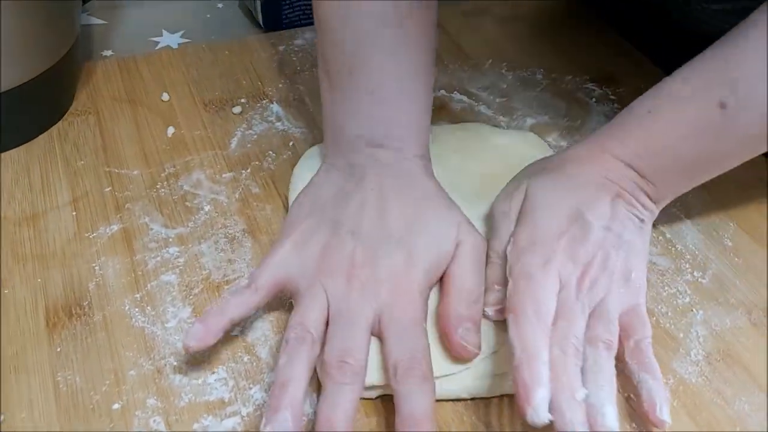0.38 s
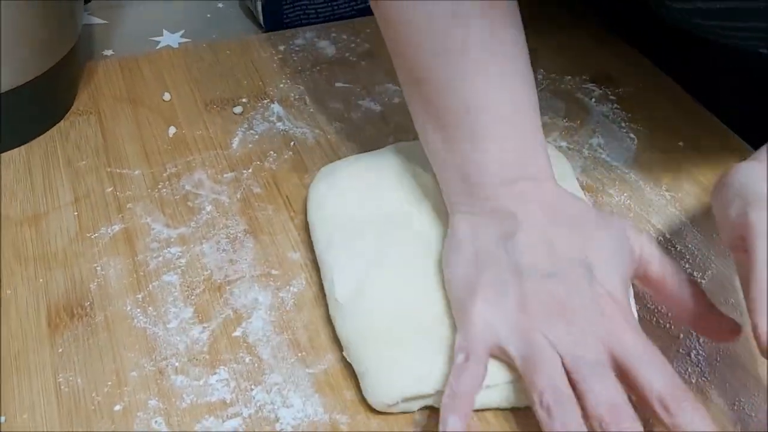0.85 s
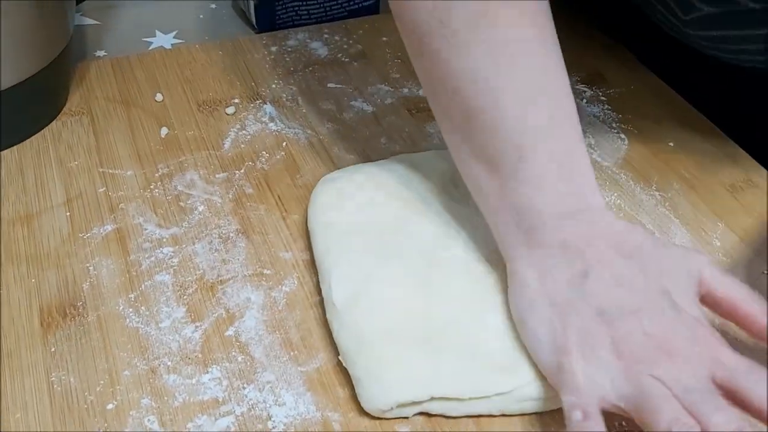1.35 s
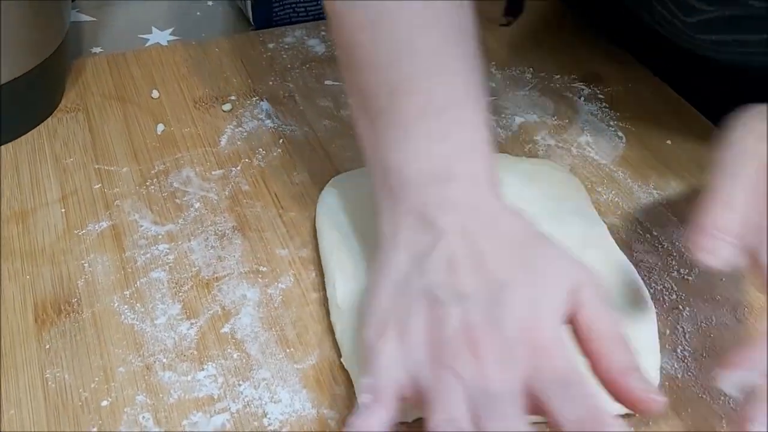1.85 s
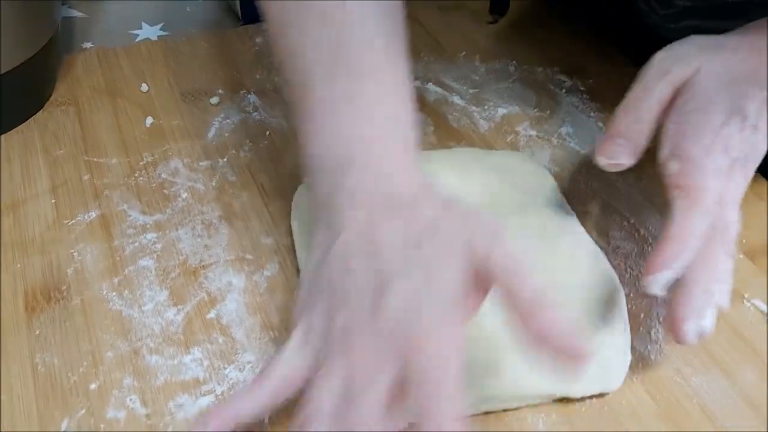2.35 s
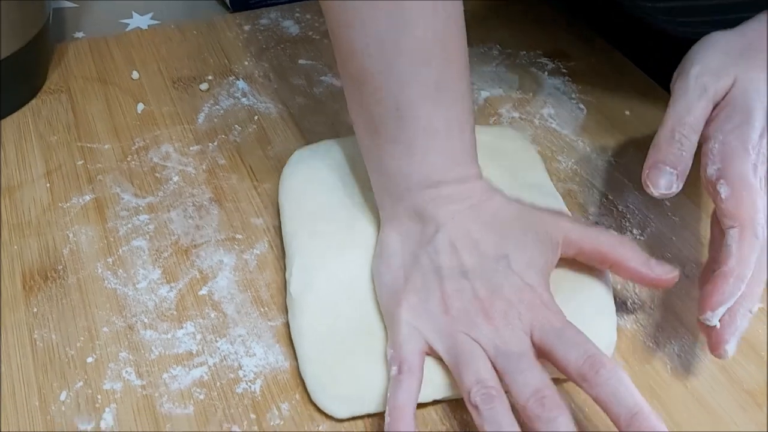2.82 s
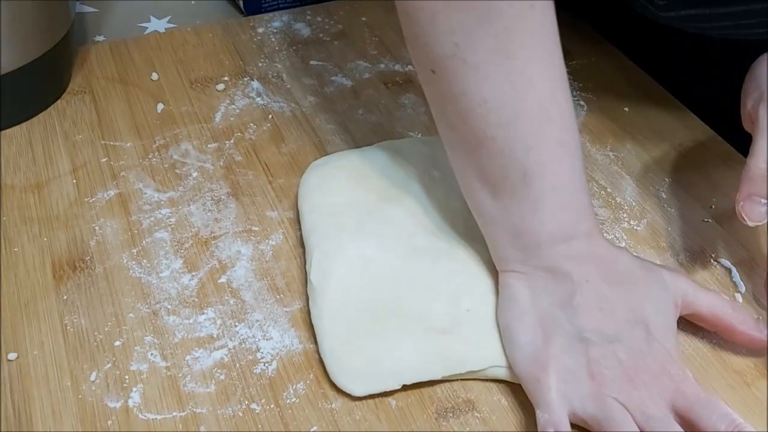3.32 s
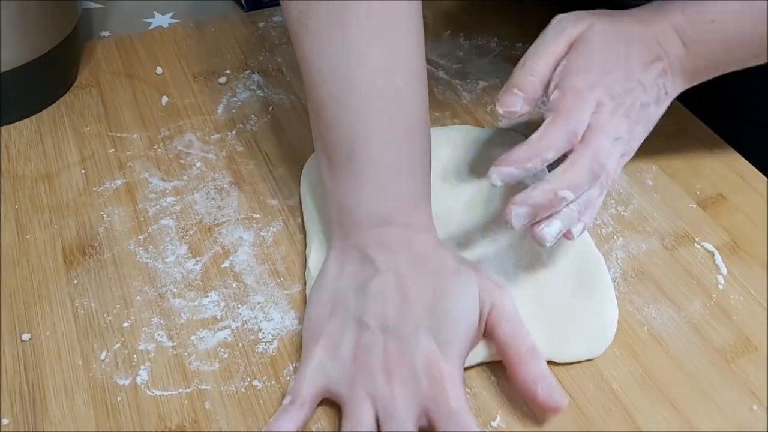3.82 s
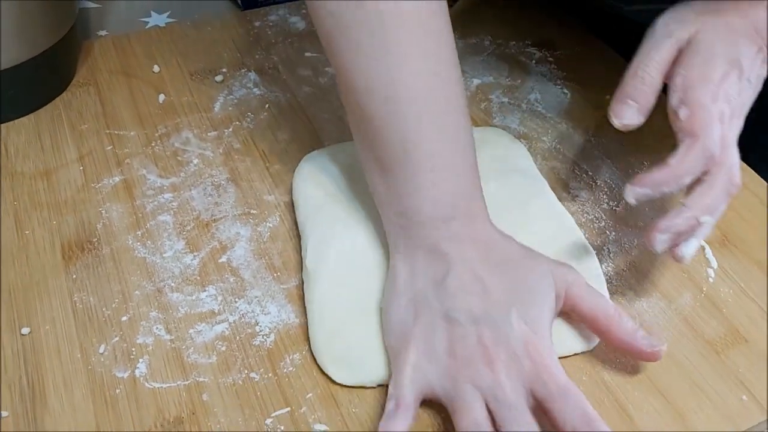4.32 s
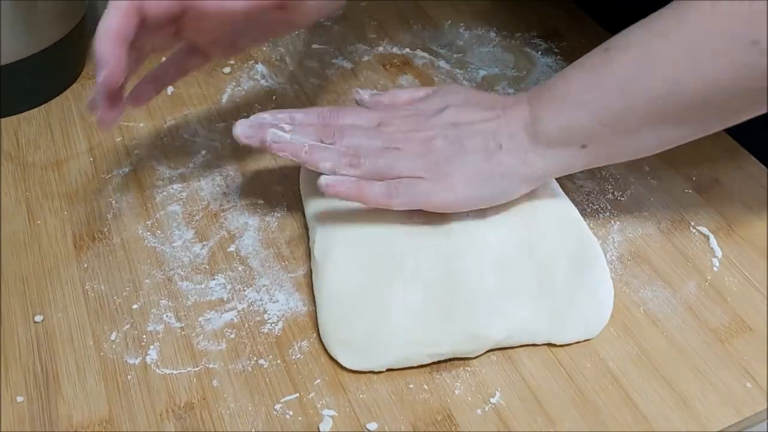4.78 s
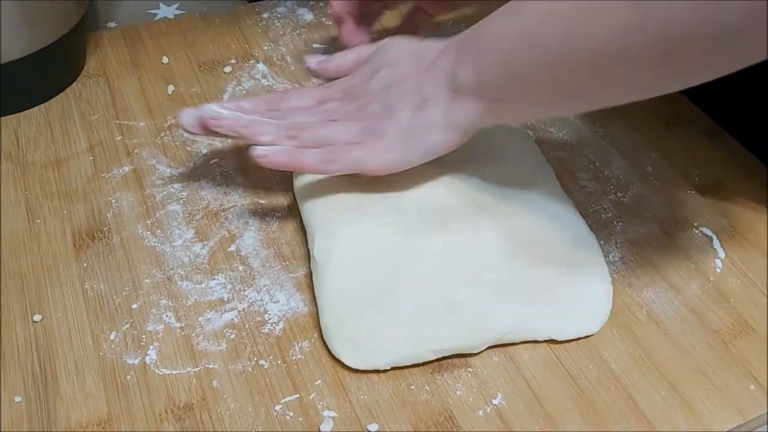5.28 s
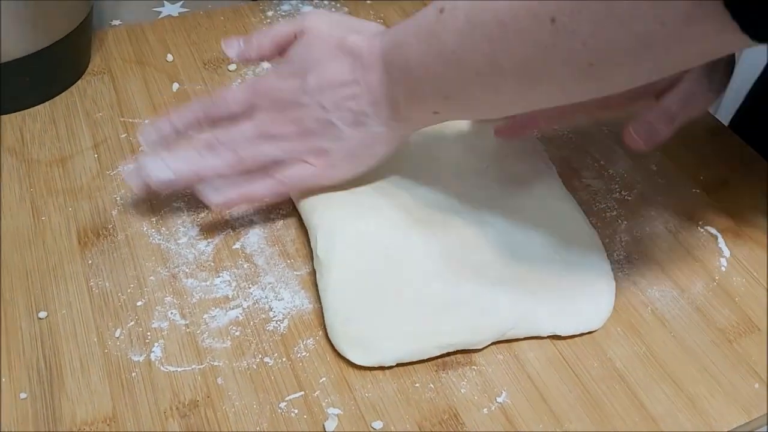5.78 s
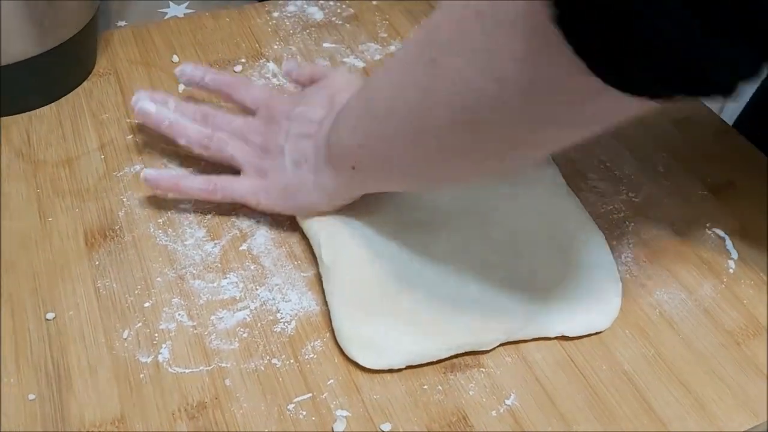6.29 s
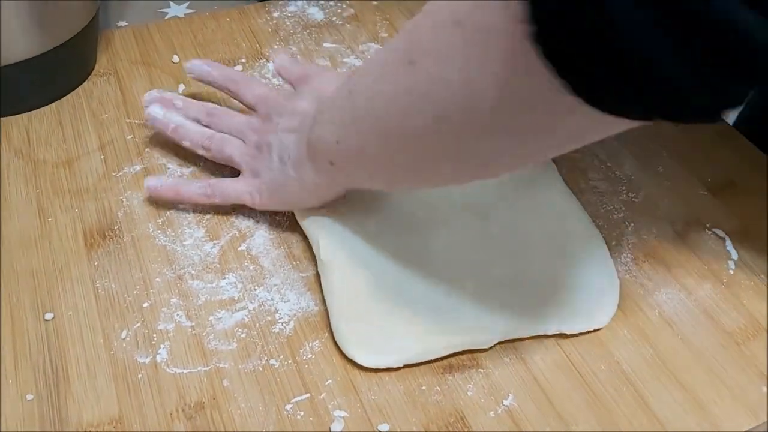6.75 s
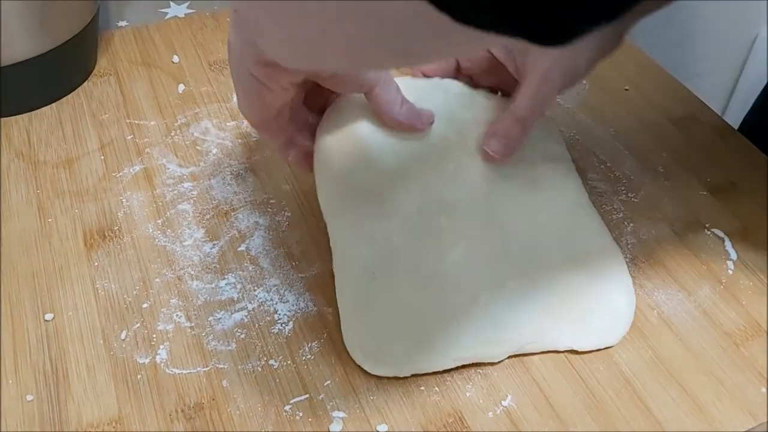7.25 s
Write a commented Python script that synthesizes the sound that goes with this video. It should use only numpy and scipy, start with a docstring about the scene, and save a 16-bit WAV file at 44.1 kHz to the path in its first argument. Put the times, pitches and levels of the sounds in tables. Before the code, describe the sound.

Soft low thuds of palms pressing a slab of dough on a floured wooden board, with dry skin hisses and several sharp snaps in a quiet kitchen.

```python
"""Dough worked on a floured board

A kitchen counter, with a phone standing on it close to the hands that pat, press and slide a slab of dough.
Presses thud as decaying low sines with the modes of board and counter; creeping dough grumbles in those modes.
Floury skin hisses and drags as shaped noise; knuckles and sticky skin snap, answered by walls and kitchen echo.
Behind lie noise room tone, a thin wavering hiss and an appliance hum made of one drifting sine."""
import sys
import numpy as np
from scipy import signal
from scipy.fft import rfft, irfft
from scipy.io import wavfile
from scipy.ndimage import uniform_filter1d

SR = 44100
rng = np.random.default_rng(int(sys.argv[2]) if len(sys.argv) > 2 else 0)


def how_loud(loudness_db):
    """Turn decibels into a plain amplitude multiplier (0 dB gives 1, 20 dB gives 10)."""
    steps = np.asarray(loudness_db, float) / 20
    return 10 ** steps


def materialize(psi):
    """Save the field psi as 16-bit PCM at rate SR to the path in sys.argv[1].

    A 1-D psi becomes a single channel; in a 2-D psi each row is a channel.
    """
    bounded = np.clip(np.atleast_2d(psi).T, -1, 1)
    quanta = np.round(bounded * 32767).astype(np.int16)
    wavfile.write(sys.argv[1], SR, quanta)


N = 325502
T = np.arange(N) / SR
SIDES = np.array([[1], [-1]])  # left, right


def level(x, db):
    """Scale to an rms level."""
    return x * how_loud(db) / np.sqrt(np.mean(x ** 2))


def on_log(hz, table):
    """Read a table of frequency and value on a logarithmic frequency axis."""
    points = np.array(table, float)
    return np.interp(np.log(np.maximum(hz, 1)), np.log(points[:, 0]), points[:, 1])


def colour(x, table):
    """Shape the spectrum of a sound by a table of frequency and level."""
    size = x.shape[-1]
    hz = np.arange(size // 2 + 1) * SR / size
    return irfft(rfft(x) * how_loud(on_log(hz, table)), size)


# How alike the two channels are: frequency_hz, correlation (0 to 1)
CHANNEL_LIKENESS = [(60, 0.87), (200, 0.93), (400, 0.53), (700, 0.48), (1300, .0), (15000, 0)]


def stereo_noise(size):
    """White noise on two channels, alike in the bass and unrelated in the treble."""
    hz = np.arange(size // 2 + 1) * SR / size
    alike = np.clip(on_log(hz, CHANNEL_LIKENESS), 0, 1)
    mid, side = rfft(rng.standard_normal((2, size)))
    shared = mid * np.sqrt((1 + alike) / 2)
    opposed = side * np.sqrt((1 - alike) / 2)
    return irfft(shared + SIDES * opposed, size)


def walk(rate):
    """Random values held for 1 / rate seconds and smoothed twice; spread near 1."""
    hold = int(SR / rate)
    steps = np.repeat(rng.standard_normal(N // hold + 1), hold)
    return 1.062 * uniform_filter1d(uniform_filter1d(steps, hold), hold)[:N]


def ring(t, hz, t60, rise, phase=0):
    """A mode pushed up over the rise time, dying from t = 0."""
    swell = np.sin(np.pi / 2 * np.clip(1 + t / rise, 0, 1)) ** 2
    decay = np.exp(-np.log(1000) * np.maximum(t, 0) / t60)
    return swell * decay * np.sin(2 * np.pi * hz * t + phase)


def add(out, sound, s):
    """Mix a sound in at time s."""
    i = max(int(s * SR), 0)
    out[..., i:i + sound.shape[-1]] += sound[..., :N - i]


def curve(table):
    """The second column of a table, drawn sample by sample over the times in the first."""
    s, value = np.transpose(table)
    return np.interp(T, s, value)


def peaks(s, db, rise_db_s, fall_db_s, rest_db):
    """Level in dB of overlapping gestures, each climbing to its peak and falling away at a steady rate."""
    s, db, rise_db_s, fall_db_s = (np.reshape(v, (-1, 1)) for v in (s, db, rise_db_s, fall_db_s))
    coarse = T[::64]
    late = coarse - s
    slope = np.where(late < 0, rise_db_s, -fall_db_s)
    power = how_loud(2 * (db + slope * late)).sum(axis=0) + how_loud(2 * rest_db)
    return np.interp(T, coarse, 10 * np.log10(power))


# Colour of the quiet kitchen: frequency_hz, relative_level_db (per Hz)
ROOM_COLOUR = [(18, -50), (30, -3.5), (95, 1), (189, -8.5), (295, 2), (364, -8), (721, -25.5),
               (1810, -31.5), (2980, -50), (7470, -29), (9460, -40.5), (14800, -34.5), (16000, -88)]


def room_tone():
    """Noise in the colour of the room, slowly wandering in level."""
    return level(colour(stereo_noise(N), ROOM_COLOUR), -68) * how_loud(3.0 * walk(2.68))


# The appliance hum wavers: time_s, level_db (rms, before small random changes)
HUM_LEVEL = [(0, -70), (.18, -67), (.57, -76), (.9, -87), (1.27, -70.5), (1.74, -68), (2.01, -76.5),
             (2.4, -69), (2.7, -84), (3.12, -95), (3.3, -69), (4.1, -77), (4.52, -71), (5.0, -74),
             (5.3, -92), (5.42, -78), (5.5, -65), (5.6, -73.5), (6.04, -66), (6.3, -67), (6.8, -72),
             (7.1, -82), (7.38, -74)]


def appliance_hum():
    """One sine whose pitch drifts a few Hz and whose level wavers, equal on both channels."""
    hz = 297.5 + 3.17 * walk(9.2)
    phase = 2 * np.pi * np.cumsum(hz) / SR
    return how_loud(curve(HUM_LEVEL) + 0.59 * walk(4)) * np.sqrt(2) * np.sin(phase)


# Colour of the thin hiss: frequency_hz, relative_level_db (per Hz)
THIN_HISS_COLOUR = [(4300, -8.5), (5200, -2), (5900, 3.5), (6600, -4.5), (8000, -9), (10000, -34)]
# The thin hiss comes and goes: time_s, level_db (rms)
THIN_HISS_LEVEL = [(0, -98), (.18, -75), (.3, -84), (.55, -83), (1.07, -86), (1.4, -103), (2.1, -85),
                   (2.7, -103), (3.15, -105), (3.3, -80.5), (3.88, -83), (4.1, -96), (4.5, -92),
                   (5.0, -67.5), (5.1, -107), (5.47, -71.5), (5.6, -102), (6.1, -76), (6.25, -78),
                   (6.37, -67.5), (6.42, -76), (6.56, -70.5), (6.8, -78.5), (6.97, -85), (7.38, -91)]


def thin_hiss():
    """A thin smooth-grained hiss: narrow treble noise following a level curve."""
    return level(colour(stereo_noise(N), THIN_HISS_COLOUR), 0) * how_loud(curve(THIN_HISS_LEVEL))


# Bands of the kitchen echo: frequency_hz, relative_level_db, decay_t60_s
KITCHEN_BANDS = [(500, 0, .45), (1000, 0, .45), (2000, 0, .45), (4000, 2, .4), (8000, -5, .25)]


def kitchen(size):
    """Echo of hard kitchen walls: dense noise, each band dying at its own rate, filling in over 18 ms."""
    t = np.arange(size) / SR
    # single reflections stand out at first and blur into each other later
    grain = np.repeat(rng.standard_normal(size // 64 + 1), 64)[:size] * np.exp(-t / .06)
    noises = rng.standard_normal((len(KITCHEN_BANDS), 2, size)) * how_loud(3.5 * grain)
    tail = 0
    for (hz, db, t60), noise in zip(KITCHEN_BANDS, noises):
        octave = signal.butter(2, [hz / np.sqrt(2), hz * np.sqrt(2)], "band", fs=SR, output="sos")
        band = signal.sosfilt(octave, noise)
        tail = tail + how_loud(db) * band / band.std() * np.exp(-np.log(1000) * t / t60)
    return tail * np.clip(t / .018, .7, 1)


# Where the hands work, seen from the phone: time_s, left_minus_right_db
HANDS_PAN = [(0, -1), (1, -1.5), (2.5, -0.4), (3.3, -1), (4.3, -2), (5.3, -1), (6.2, -.6), (7.38, 1)]


def hands_pan():
    """Gains of the two channels as the hands move across the board."""
    return how_loud(SIDES * curve(HANDS_PAN) / 2)


# Body weight leaning in sets the counter ringing: time_s, level_db (before panning)
COUNTER_LEANS = [(.115, -56), (.346, -48), (.42, -32), (1.044, -49.5), (1.131, -54), (1.224, -55),
                 (1.51, -50), (1.588, -51), (1.762, -36.5), (2.347, -45.5), (2.541, -53), (2.7, -39.5),
                 (3.284, -41), (3.358, -51), (3.423, -53.5), (3.578, -51), (4.386, -41.5), (4.455, -40.5),
                 (4.5, -42), (4.781, -32.5), (4.815, -40), (4.894, -44), (4.99, -45.5), (5.177, -55),
                 (5.559, -48), (6.277, -46), (6.5, -47), (6.54, -46), (6.578, -54)]


def counter(rise=0.029, late_s=0.0198):
    """The heavy counter answers late and rings slowly in one low mode."""
    out = np.zeros((2, N))
    t = np.arange(int(.4 * SR)) / SR - .05
    for (s, db), apart in zip(COUNTER_LEANS, rng.standard_normal(len(COUNTER_LEANS))):
        boom = ring(t - late_s, 72.8, 0.37, rise, 4.64 + 0.21 * apart * SIDES)
        add(out, how_loud(db) * boom * (1 - t / t[-1]), s - .05)
    return out


# Modes of the wooden board, nominal: pitch_hz, relative_level_db, decay_t60_s
BOARD_MODES = [(140, -1, 0.048), (165, -16, 0.43), (208.1, -5, 0.2), (238, -8, 0.2), (277.6, -8.5, 0.19),
               (311.4, -10.5, 0.15), (328.9, -13, 0.35), (392.5, -6.5, 0.075), (451.6, -13.5, 0.18),
               (504, -10, 0.13), (581.6, -15, 0.15), (637, -18, 0.21), (700, -19.5, 0.069),
               (784, -24.5, 0.15), (880, -19.5, 0.093), (962, -17.5, .05), (1104, -27, 0.12)]


def board(t, rise, chance, soft_db, scatter):
    """All board modes; each blow lands elsewhere, so weights differ, and each channel hears them a little apart."""
    hz, db, t60 = np.transpose(BOARD_MODES)[:, :, None, None]
    weight, phase, detune, apart = chance[:, :, None, None]
    spread = apart * np.sqrt(1 - np.clip(on_log(hz, CHANNEL_LIKENESS), 0, 1)) * SIDES
    # a soft, long contact hardly moves the high modes: soft_db is lost per octave
    db = db - soft_db * np.log2(hz / hz[0])
    modes = how_loud(db + 4.03 * weight) * ring(t, hz * (1 + 0.04 * detune), t60, rise, scatter * phase + spread)
    return modes.sum(axis=0) / np.sqrt(np.sum(how_loud(2 * db)))


# Dough creeping on the wood under each kneading stroke: peak_s, level_db (overlaps add up)
KNEADING_STROKES = [(0, -59), (.2, -62), (.33, -57), (.47, -48.5), (.55, -55), (.617, -54.5), (.79, -65.5),
                    (.915, -61), (1.0, -56.5), (1.095, -63.5), (1.229, -60.5), (1.53, -52.5), (1.63, -64),
                    (1.809, -49.5), (1.9, -76), (2.068, -58.5), (2.15, -57.5), (2.38, -66), (2.53, -64),
                    (2.792, -61), (3.01, -58), (3.14, -63), (3.27, -58.5), (3.38, -58.5), (3.53, -58.5),
                    (3.67, -59.5), (3.83, -61.5), (4.1, -64), (4.34, -61.5), (4.516, -56), (4.69, -60),
                    (4.85, -60), (4.97, -58), (5.09, -54.5), (5.27, -60), (5.56, -55), (5.75, -61.5),
                    (5.9, -58.5), (6.07, -63.5), (6.17, -56.5), (6.3, -56), (6.45, -55), (6.59, -55),
                    (6.79, -58), (7.11, -68.5), (7.33, -65.5)]


def creep():
    """Level in dB of the dough creeping on the wood, over a floor for the hands at rest."""
    rise_db_s, fall_db_s, rest_db = 163, 122, -73.5
    return peaks(*np.transpose(KNEADING_STROKES), rise_db_s, fall_db_s, rest_db)


def grumble(creep_db):
    """Dough creeping on wood jolts the board: uneven noise rings its modes, damped to 0.43 of their decay."""
    jolts = stereo_noise(N) * how_loud(2.7 * walk(60))
    t = np.arange(int(.2 * SR)) / SR
    modes = sum(how_loud(db) * ring(t, hz, 0.43 * t60, .001) for hz, db, t60 in BOARD_MODES)
    return level(signal.fftconvolve(jolts, modes[None])[:, :N], 0) * how_loud(creep_db)


# Skin sliding over flour: fastest_s, length_s, flour_hiss_db, palm_drag_db, finger_drag_db
# (levels before panning; overlaps add up, and the palm's skin noise and squeal come out louder than listed)
SKIN_SLIDES = [(.0, 0.28, -67.5, -76.5, -80), (.19, 0.29, -65, -77.5, -61.5),
               (0.304, 0.4, -64, -69.5, -67.5), (0.46, 0.073, -72, -69, -72), (0.607, .1, -62, -69.5, -69),
               (0.781, 0.2, -70.5, -84.5, -85.5), (0.908, 0.17, -63, -67.5, -70),
               (1.018, 0.11, -93, -91, -88), (1.197, 0.24, -85.5, -80.5, -84),
               (1.342, 0.49, -83.5, -93, -90), (1.472, 0.11, -60.5, -71, -60), (1.58, 0.14, -87, -86, -92),
               (1.849, 0.12, -70.5, -90, -85), (1.949, .15, -82, -93, -95), (2.063, 0.14, -65, -72.5, -70),
               (2.182, 0.17, -81, -91, -87), (2.417, 0.36, -76, -79.5, -86), (2.511, 0.23, -67.5, -78, -73),
               (2.692, 0.11, -58.5, -63.5, -71), (2.962, .04, -78, -72, -67), (3, .12, -79, -90, -82),
               (3.271, 0.095, -61, -70, -63.5), (3.389, 0.48, -97, -76.5, -88),
               (3.545, 0.15, -91, -68, -79), (3.7, .3, -98, -85, -98), (3.851, 0.14, -66, -72, -68.5),
               (3.965, 0.28, -100, -81, -92), (4.346, 0.11, -61.5, -62.5, -73),
               (4.48, 0.5, -74.5, -72.5, -85), (4.79, 0.13, -71.5, -77, -73.5), (4.929, .2, -69, -60, -64),
               (5.009, 0.18, -61, -66, -65.5), (5.285, 0.37, -73, -73.5, -75),
               (5.386, 0.29, -87, -91.5, -89), (5.586, 0.066, -62.5, -65, -68),
               (5.553, 0.22, -68.5, -73, -76), (5.694, 0.19, -75, -78, -83), (5.843, .2, -81, -96.5, -95),
               (6.03, .15, -73.5, -79, -77.5), (6.105, 0.23, -69.5, -71, -73),
               (6.304, 0.22, -74.5, -73, -68), (6.45, 0.17, -96, -70.5, -75),
               (6.582, 0.18, -68.5, -81, -81), (6.806, 0.25, -61.5, -73.5, -64.5),
               (6.9, 0.15, -64, -71, -65), (6.995, 0.13, -79, -95, -91), (7.104, 0.088, -73.5, -82, -87),
               (7.219, 0.15, -63, -76, -69.5), (7.286, 0.13, -61.5, -78.5, -68)]


def slides(creep_db):
    """Levels in dB of flour, palm and fingers; the palm also drags while the dough creeps."""
    s, length, *levels = np.transpose(SKIN_SLIDES)
    rise_share, edge_drop_db = 0.29, 17.5  # share of the length before the fastest point; drop at both ends
    rise = edge_drop_db / (rise_share * length)
    fall = edge_drop_db / ((1 - rise_share) * length)
    flour_db, palm_db, finger_db = (peaks(s, db, rise, fall, -105) for db in levels)
    palm_creep_db = creep_db - 23
    return flour_db, 10 * np.log10(how_loud(2 * palm_db) + how_loud(2 * palm_creep_db)), finger_db


# Colour of the flour grains: frequency_hz, relative_level_db (per Hz)
FLOUR_COLOUR = [(2500, -14), (4000, -5.5), (6000, 3.5), (7600, 5), (10000, -0.5), (13800, 0), (16000, -11)]


def flour_hiss(flour_db):
    """Flour grains hiss under the skin: treble noise in a fast random flutter."""
    return level(colour(stereo_noise(N) * how_loud(2.14 * walk(300)), FLOUR_COLOUR), 0) * how_loud(flour_db)


# Centre of the skin squeal: time_s, pitch_hz
SQUEAL_PITCH = [(0, 1050), (.12, 1042), (.19, 2004), (.42, 1700), (.48, 946), (.9, 1083), (1.3, 1049),
                (1.45, 1400), (1.56, 957), (1.95, 901), (2.05, 1425), (2.14, 996), (2.5, 1100), (2.72, 900),
                (3.2, 1180), (3.27, 1399), (3.38, 1129), (4.0, 1170), (4.09, 1593), (4.36, 1050),
                (4.7, 1129), (4.88, 1630), (4.98, 1594), (5.1, 1195), (5.29, 1477), (5.55, 1132),
                (6.7, 1129), (6.9, 1718), (7.1, 1091), (7.22, 1650)]


def squeal(width_hz):
    """Skin juddering on flour: a coarse noisy resonance whose centre wanders."""
    lowpass = signal.butter(2, width_hz / 2, fs=SR, output="sos")
    slow = signal.sosfilt(lowpass, rng.standard_normal((2, 2, N)))
    phase = 2 * np.pi * np.cumsum(curve(SQUEAL_PITCH)) / SR
    return level(slow[0] * np.cos(phase) + slow[1] * np.sin(phase), 0)


# Colour of the dragging palm: frequency_hz, relative_level_db (per Hz)
PALM_COLOUR = [(400, -16.5), (700, -7), (950, -7), (1300, -5), (1800, -4), (2300, -10.5), (3200, -21)]


def palm_drag(palm_db):
    """The palm drags in the mids: uneven shaped noise joined by the skin squeal."""
    skin = level(colour(stereo_noise(N) * how_loud(2.0 * walk(50)), PALM_COLOUR), 4.1)
    return (skin + squeal(260)) * how_loud(palm_db)


# Colour of the dragging fingers: frequency_hz, relative_level_db (per Hz)
FINGER_COLOUR = [(1200, -56), (1700, 4.5), (2300, 1.5), (3000, -2), (4200, 2.5), (5000, -3.5), (6500, -59)]


def finger_drag(finger_db):
    """Fingers drag higher than the palm: uneven shaped noise."""
    return level(colour(stereo_noise(N) * how_loud(1.3 * walk(98)), FINGER_COLOUR), 0) * how_loud(finger_db)


# Snaps into the kitchen: start_s, crack_level_db (halved in amplitude when played), lowest_hz, highest_hz,
# echo_db (relative to the crack), board_knock_db
SNAPS = [(0.4342, -42.5, 900, 9900, -14, -29.5), (0.556, -70, 800, 2460, -5, -51),
         (1.159, -62, 902, 2930, -14, -55), (1.445, -43.5, 4240, 11900, -22, -86),
         (1.4915, -54, 800, 2430, -2, -49), (1.610, -75, 700, 2200, -3, -50.5),
         (1.739, -57, 900, 3000, 1, -58), (1.747, -42.5, 700, 2380, -5.5, -38.5),
         (2.0622, -55.5, 1174, 5000, -7, -52), (2.3236, -68, 998, 2800, 6, -64),
         (2.963, -56.5, 600, 2820, 4.5, -47.5), (3.257, -57, 2970, 10000, 10, -65),
         (3.499, -58, 605, 1520, -6, -55), (3.5275, -60, 1500, 2670, -1, -66),
         (4.095, -62, 1307, 2430, 4.5, -73), (4.3361, -52, 910, 10350, 5, -56),
         (4.364, -50, 500, 1100, 6, -43), (4.443, -54.5, 790, 1400, 2.5, -48),
         (4.5969, -58.5, 910, 1580, -1, -54.5), (4.867, -36.5, 1550, 6800, 0, -67),
         (5.07, -66, 500, 1485, 4, -46.5), (5.1441, -27.5, 1455, 7190, -2, -53),
         (5.456, -41, 1190, 4315, 2.5, -67), (5.6339, -34.5, 1234, 5960, 0.5, -57.5),
         (6.184, -46, 1365, 4560, 2, -57.5), (7.1783, -67, 3890, 10920, 3, -80)]
# Nearest walls: delay_s (after the snap), level_db (added to the echo's)
NEAR_WALLS = [(.016, -15), (.024, -18)]


def snaps(crack_cycles=2.2):
    """A few ms of crack, a knock of the board, the nearest walls and the kitchen answering."""
    out = np.zeros((2, N))
    t = np.arange(int(.3 * SR)) / SR
    echo = kitchen(int(.45 * SR))
    noise = rng.standard_normal((len(SNAPS), 2, 512))
    chance = rng.standard_normal((len(SNAPS), 4, len(BOARD_MODES)))
    for (s, db, low_hz, high_hz, echo_db, knock_db), n, c in zip(SNAPS, noise, chance):
        band = signal.butter(3, [low_hz, high_hz], "band", fs=SR, output="sos")
        # duller contacts last longer, up to a limit
        crack_s = min(crack_cycles / low_hz, .0028)
        crack = signal.sosfilt(band, n * np.exp(-t[:512] / crack_s))
        crack = crack * how_loud(db) / np.sqrt(np.mean(crack[:, :64] ** 2)) / 2
        add(out, crack, s)
        for late_s, wall_db in NEAR_WALLS:
            # reflections swap the two sides
            add(out, crack[::-1] * how_loud(echo_db + wall_db), s + late_s)
        # the room smears the crack: its band remains, and its energy sets the echo's
        tail = signal.sosfilt(band, echo)
        add(out, how_loud(echo_db) * tail * np.sqrt(np.sum(crack ** 2) / np.sum(tail ** 2)), s)
        # a sharp contact favours the high modes
        add(out, how_loud(knock_db) * board(t - .002, 0.0018, c, -1.7, 1.0), s)
    return out


def shudders(creep_db):
    """Small random presses while the dough creeps, as rows like the large ones."""
    per_s, above_creep_db, centre_hz, t60_s = 17, 1.5, 118, 0.066
    s = np.arange(0, N / SR - .1, 1 / per_s)
    late, size, pitch, wood = rng.standard_normal((len(s), 4)).T
    s = np.clip(s + 0.011 * late, .05, None)
    db = np.interp(s, T, creep_db) + above_creep_db + 2.3 * size
    hz = centre_hz * 2 ** (.22 * pitch)
    return np.transpose([s, db, hz, np.full(len(s), t60_s), -9 + 3.15 * wood])


# Palms pressing the dough, close to the phone:
# fullest_push_s, level_db (before panning), thud_pitch_hz, thud_t60_s, board_ring_db (above the thud)
PALM_PRESSES = [(0.096, -38.5, 96, 0.039, -12), (0.116, -49.5, 127, 0.081, -5), (.152, -54.5, 109, .08, 1),
                (.185, -53.5, 120, .08, -2), (.275, -46, 95, 0.37, -27), (0.305, -36, 103.2, 0.25, -8),
                (.346, -40, 145, .023, -12), (0.419, -31.5, 99, 0.15, -14), (.45, -17.5, 98, 0.053, -8),
                (.488, -32.5, 162, .12, -0.5), (0.535, -41.5, 130, 0.027, -4.5),
                (.571, -39, 125, 0.047, -18), (.597, -37.5, 122, 0.039, -4.5),
                (0.645, -47.5, 123, 0.049, -4), (.736, -54.5, 137, 0.12, -13),
                (.892, -47, 86.4, 0.082, -30), (.961, -40.5, 124.8, 0.041, -8),
                (0.985, -50.5, 125, 0.094, -3.5), (1.044, -46.5, 119, 0.12, -4.5),
                (1.088, -51, 101, 0.047, -10), (1.175, -42.5, 95, 0.12, -22), (1.225, -43, 133, 0.1, -8),
                (1.498, -39, 126, .05, -5.5), (1.509, -35.5, 119, .063, -5.5), (1.56, -52.5, 149, .23, 5),
                (1.627, -47.5, 116, 0.25, 3), (1.761, -34, 98, .051, -22), (1.817, -35, 126, 0.16, -10),
                (1.843, -48.5, 107.6, 0.13, -8), (1.874, -42, 108, 0.028, -14), (1.9, -51, 110, .07, -9),
                (2.079, -46.5, 118, 0.24, -6.5), (2.159, -46, 127, .17, -7), (2.224, -51, 140, 0.12, -9),
                (2.25, -51, 137.2, .06, -9), (2.324, -56, 102, .11, -8), (2.346, -38, 110, 0.088, -37),
                (2.444, -54, 128, 0.16, -21), (2.541, -39.5, 106.4, 0.13, -14), (2.61, -55, 111, 0.13, -10),
                (2.655, -51.5, 89, 0.12, -11), (2.681, -49.5, 147.2, 0.13, -20),
                (2.701, -34.5, 100, .093, -22), (2.757, -34, 92.7, 0.094, -8),
                (2.993, -44.5, 126.6, 0.1, -2.5), (3.018, -48.5, 130.5, 0.14, -0.5),
                (3.155, -42.5, 97.6, 0.092, -14), (3.285, -35, 110.3, 0.065, -16.5),
                (3.308, -48.5, 109, .06, -11), (3.336, -41, 100, .062, -7),
                (3.376, -43.5, 82.8, 0.093, -9.5), (3.41, -50, 85, .09, -13), (3.539, -38, 97.5, 0.14, -14),
                (3.578, -43.5, 122, .27, -2.5), (3.617, -51, 136, .055, -7), (3.681, -44, 103, 0.092, -17),
                (3.704, -49, 108, 0.1, -12), (3.797, -53, 112, 0.067, -20), (3.856, -43.5, 103, 0.18, -20),
                (3.888, -49.5, 118, 0.092, -9), (4.119, -50.5, 103, .069, -18), (4.353, -46, 123, .06, -13),
                (4.386, -32, 122, 0.02, -9.5), (4.427, -33.5, 119, .029, -20), (4.446, -38, 91, 0.067, -21),
                (4.478, -39, 92, 0.048, -5), (4.501, -49, 86, .12, -2), (4.606, -47, 127, 0.22, -11),
                (4.656, -50.5, 127.5, .06, -7.5), (4.782, -34, 102.7, .13, -16.5),
                (4.816, -31, 90, 0.091, -17), (4.849, -31.5, 96, 0.057, -20),
                (4.873, -30, 105.7, 0.066, -16.5), (4.892, -37.5, 80.2, 0.33, -11.5),
                (4.916, -50, 78.1, .092, -1), (4.989, -41, 82.5, .1, -11), (5.072, -38, 97, .1, -18),
                (5.089, -32.5, 95.8, 0.15, -14.5), (5.125, -51.5, 95.6, 0.063, 1),
                (5.178, -48, 96.8, 0.089, -14), (5.195, -43, 106.5, 0.15, -12),
                (5.258, -50.5, 108, .06, -1.5), (5.559, -46, 116.3, .19, 1.5),
                (5.625, -46, 134.1, 0.058, -10), (5.643, -44, 99.9, 0.093, -16), (5.673, -50, 122, 0.16, 0),
                (5.714, -40, 122.2, .077, -5), (5.742, -49.5, 143, 0.19, -12), (5.791, -55, 91.5, .09, -8),
                (5.828, -49.5, 102, 0.062, -14), (5.858, -41.5, 108, 0.21, -14.5),
                (5.88, -41, 143, 0.086, -8), (5.921, -52, 126, 0.084, -14), (5.957, -52, 129, 0.081, -21),
                (6.124, -48, 111, 0.25, 1), (6.221, -50, 158, 0.041, -13), (6.277, -39, 118.7, 0.035, -7),
                (6.313, -41.5, 117, 0.076, -8), (6.358, -49, 140, 0.042, -21), (6.436, -53, 123.3, .1, -6),
                (6.474, -40.5, 143, 0.1, -10), (6.499, -42.5, 133, 0.061, -9),
                (6.539, -38, 134, 0.059, -7.5), (6.578, -44, 101.3, .04, -2.5),
                (6.673, -41.5, 108.9, 0.075, -6), (6.694, -49.5, 118, 0.18, 1),
                (6.792, -47, 112, .071, -9.5), (7.06, -57, 109.9, .08, -8), (7.14, -57.5, 120, 0.074, -9),
                (7.23, -60.5, 110, .08, -6), (7.31, -57.5, 115, .08, -9.5)]


def presses(rows, rise=0.014, knock_rise=0.013, knock_lead=.012, harder=0.22):
    """A palm sinks into dough: a low thud and the board's ring, which peaks slightly before it."""
    out = np.zeros((2, N))
    t = np.arange(int(.3 * SR)) / SR - .05
    fade = np.clip((t[-1] - t) / .05, 0, 1)
    chance = rng.standard_normal((len(rows), 4, len(BOARD_MODES)))
    for (s, db, hz, t60, board_db), c in zip(rows, chance):
        thud = ring(t, hz, t60, rise, 4.54 + 0.18 * c[3, 0] * SIDES)
        # a harder blow meets the board more suddenly
        sudden_rise = knock_rise * how_loud(-harder * max(db + 44.5, 0))
        wood = board(t + knock_lead, sudden_rise, c, 2.5, 3.13)
        add(out, how_loud(db) * (thud + how_loud(board_db) * wood) * fade, s - .05)
    return out


def scene():
    """Everything on and around the board, from the room to the hands."""
    background = room_tone() + appliance_hum() + thin_hiss()
    creep_db = creep()
    flour_db, palm_db, finger_db = slides(creep_db)
    skin = flour_hiss(flour_db) + palm_drag(palm_db) + finger_drag(finger_db)
    thuds = counter() + presses(shudders(creep_db)) + presses(PALM_PRESSES)
    return background + grumble(creep_db) + snaps() + (skin + thuds) * hands_pan()


def top_cut(x):
    """Nothing passes above the cut-off."""
    return signal.sosfilt(signal.butter(12, 16430, fs=SR, output="sos"), x)


def record(dry):
    """The phone drops the deepest bass, below about 54 Hz."""
    highpass = signal.butter(3, 54, "high", fs=SR, output="sos")
    return top_cut(signal.sosfilt(highpass, dry))


dry = scene()
out = record(dry)
materialize(out)
```